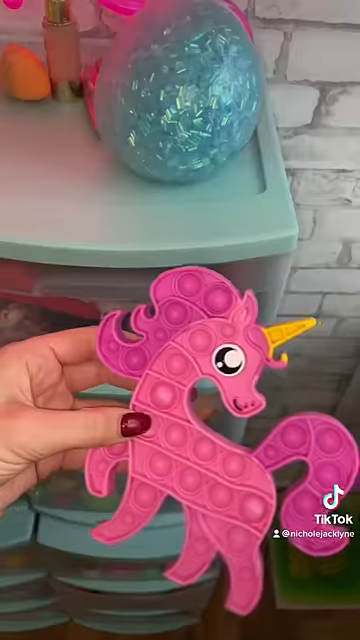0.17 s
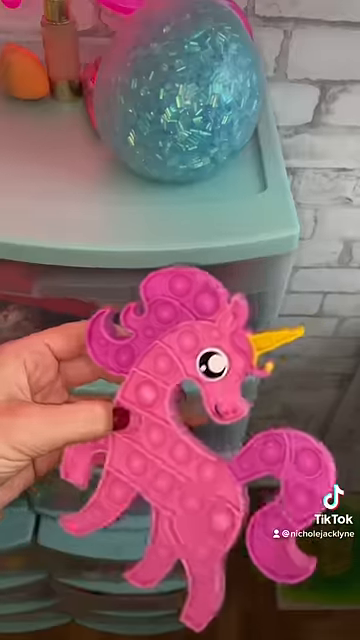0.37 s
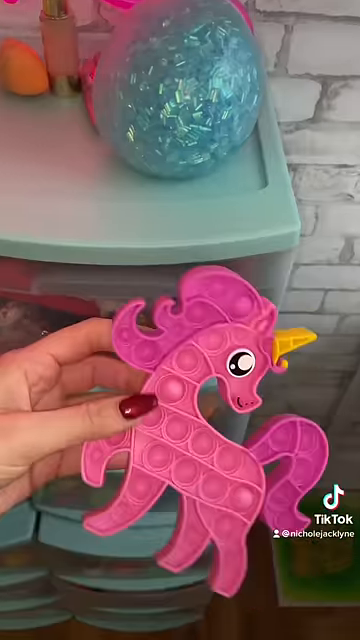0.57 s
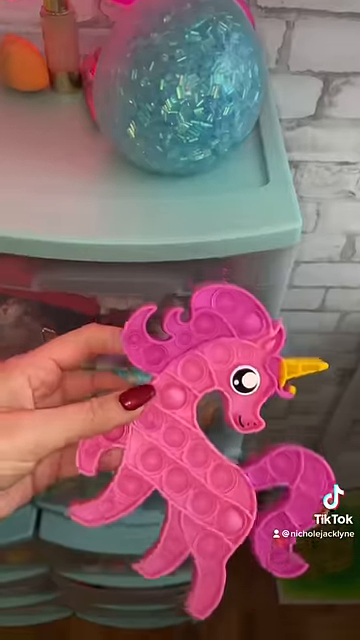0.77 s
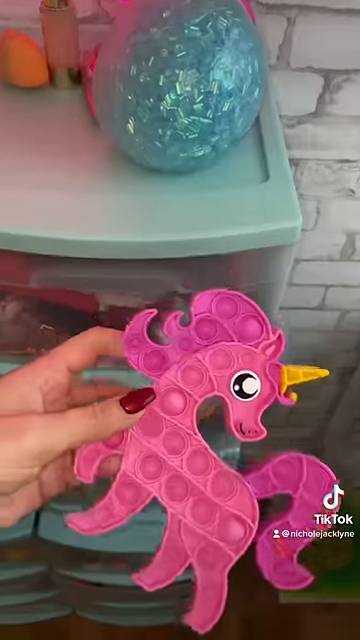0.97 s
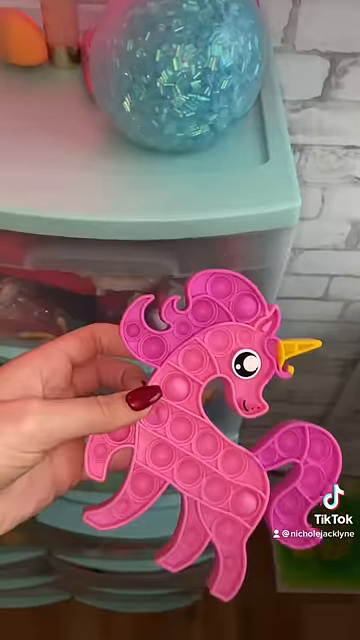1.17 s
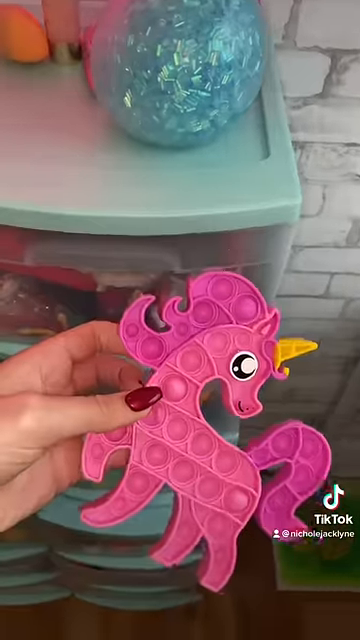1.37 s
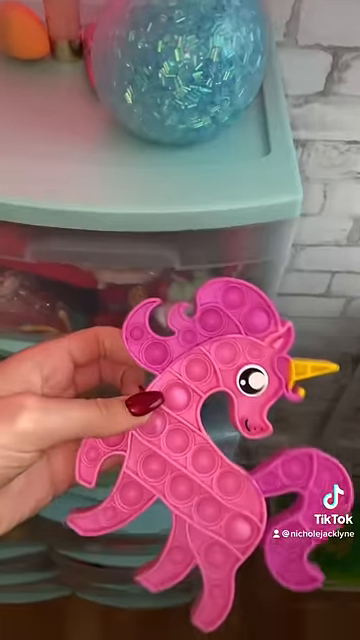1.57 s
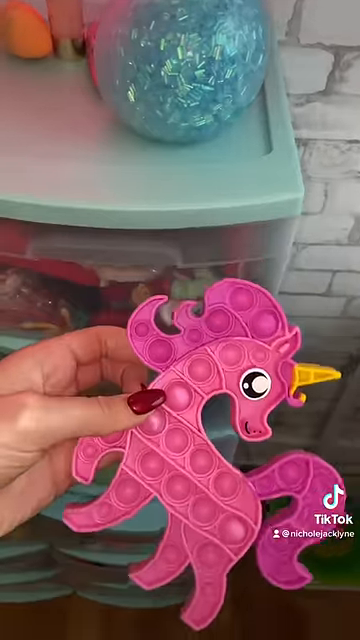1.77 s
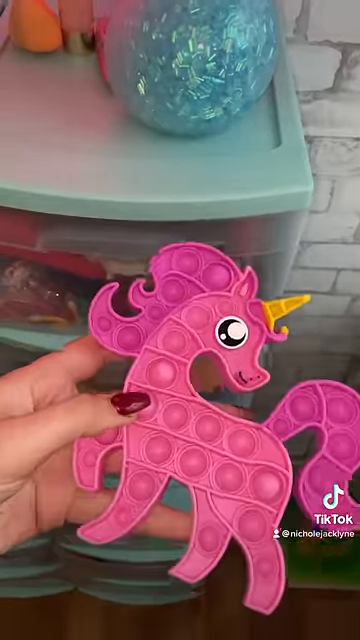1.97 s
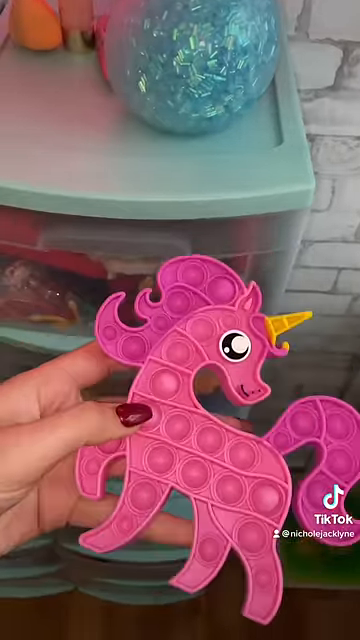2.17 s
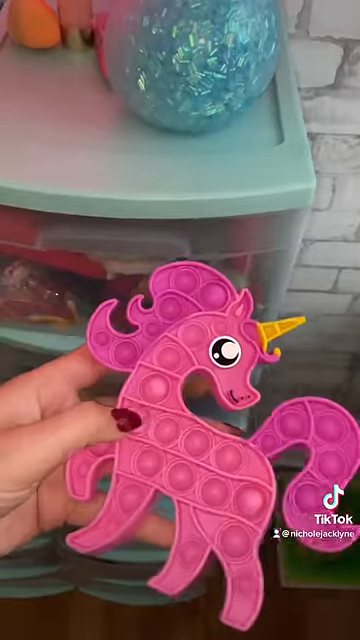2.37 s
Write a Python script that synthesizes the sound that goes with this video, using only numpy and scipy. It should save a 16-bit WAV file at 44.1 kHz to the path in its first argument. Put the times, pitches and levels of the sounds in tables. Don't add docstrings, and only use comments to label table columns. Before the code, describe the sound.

A hand presses a silicone bubble toy close to a phone microphone: one loud sharp pop, then two much softer ones, with tiny nail ticks and skin rubs between, in a quiet, bare, slightly echoing room with low hum.

```python
import sys
import numpy as np
from scipy import signal
from scipy.fft import rfft, irfft, next_fast_len
from scipy.io import wavfile
from scipy.ndimage import uniform_filter1d

SR = 44100
rng = np.random.default_rng(int(sys.argv[2]) if len(sys.argv) > 2 else 0)


def elevation(decibels):
    levels = np.asarray(decibels, float)
    return 10 ** (levels / 20)


def transcribe(u):
    v = np.clip(np.atleast_2d(u).T, -1, 1)
    q = np.round(v * 32767).astype(np.int16)
    wavfile.write(sys.argv[1], SR, q)


N = 106060

# t/s, direction (+1 or -1), rim f/Hz, build-up factor
FLIPS = [
    (.2461, 1, 3150, 1.0),
    (1.6540, -1, 3420, 1.15),
    (2.26713, 1, 3290, 1.05),
]
# level/dB, pitch factor, low modes/dB, brightness/dB, peel hiss/dB
POPS = [
    (-12.5, 1.029, -3.5, -8, -46.5),
    (-23.5, 1.036, -5.5, -7, -55),
    (-25, 0.955, -6, -15.5, -78),
]
# f/Hz, level/dB, polarity; the last is the rim, whose f is a factor on its own pitch
DOME_MODES = [(291.6, -36.5, -1), (510, -4, -1), (1124, 0, 1), (1890, -10.5, -1), (0.982, -5.5, 1)]
BUILD_MS = [1.5, 1.6, 1.15, .95, .7]
SOFTNESS = 1.8
DIRECT_BUILD = 0.83
SIDEWAYS_BUILD = 0.75
PEEL_RISE_S, PEEL_FALL_S = 0.004, 0.002
PEEL_HZ, PEEL_WIDTH_HZ = 8200, 6500
# t/s, peak level/dB, f/Hz, build-up/ms
TICKS = [(.1440, -47, 2610, 0.38), (.2451, -35.5, 6280, 0.72), (0.2479, -42.5, 5080, 0.43),
         (.2520, -48, 6300, 0.79), (.435, -62, 7900, 0.89), (0.542, -57, 3520, 0.47),
         (.584, -58, 3600, 0.74), (0.6596, -50.5, 1930, 0.79), (0.6591, -52.5, 6440, .5),
         (.7597, -56.5, 1177, 1.3), (.7598, -53, 3400, 0.38), (1.2175, -54, 3380, 0.2),
         (1.291, -61.5, 8730, 1.0), (1.290, -48, 560, 2.5), (1.351, -53, 790, 1.4),
         (1.4601, -65, 1120, 1.8), (1.653, -46, 2560, 1.9)]
# middle t/s, half length/s, level/dB, centre f/Hz, width/Hz
RUBS = [(0.07, 0.044, -67.5, 7600, 6000), (0.237, .04, -62, 7200, 4260), (.28, 0.098, -69.5, 6060, 2520),
        (0.507, 0.26, -75, 3230, 2530), (0.63, 0.049, -70.5, 8800, 6140), (.88, 0.054, -70, 3500, 3000),
        (.881, 0.026, -74.5, 10200, 4000), (1.287, 0.0058, -64, 658, 500), (1.362, 0.011, -78, 720, 590),
        (1.6545, 0.0069, -55.5, 3340, 900), (.20, 0.056, -76, 11000, 3000), (.42, 0.22, -79.5, 7810, 7960),
        (1.932, 0.1, -74, 2920, 2000), (1.963, 0.034, -68, 7510, 3000), (2.202, 0.35, -78.5, 5690, 500)]
RUB_GRAIN = 0.25
# f/Hz, t60/s
ROOM_DECAY = [(250, .4), (500, .5), (800, 0.74), (1300, 0.82), (2000, 0.56), (3500, 0.59), (8000, 0.33)]
# f/Hz, level/dB
ROOM_TONE = [(250, 8), (500, -1.5), (800, 5.5), (1100, -7.5), (1400, -1.5), (2200, 5), (3300, -2.5),
             (6000, -1.5)]
ROOM_DB, ROOM_GAP_S = -12.5, 0.0044
# delay/s, level/dB
ECHOES = [(.0072, -25), (.0098, -29), (.0135, -27)]
# t/s, f/Hz, level/dB
HUM = [
    [(0.0, 63.1, -52), (0.036, 64.5, -49), (0.06, 68.38, -48.5)],
    [(0.15, 64.46, -54.5), (0.344, 67.85, -61), (0.422, 64.5, -61), (0.488, 64.76, -45.5),
     (0.62, 64.63, -60)],
    [(0.62, 66.4, -52), (0.696, 69.5, -55.5), (0.728, 72.04, -68), (0.796, 65.98, -47), (1.09, 66.55, -58)],
    [(1.2, 63.8, -61), (1.376, 64.86, -47), (1.528, 63.8, -75), (1.57, 67, -91), (1.6, 62.4, -60)],
    [(1.6, 61.65, -68), (1.622, 68.2, -50), (1.692, 65.5, -52.5), (1.78, 63.54, -57), (1.96, 62.1, -53.5)],
    [(2.07, 60.4, -61.5), (2.11, 60.3, -53.5), (2.138, 58, -83), (2.272, 66.1, -51.5), (2.4, 65.3, -56)],
]
HUM_WIDTH_HZ, HUM_NOISE_DB = 16, -7
# t/s, level/dB, pitch factor
RUMBLE = [
    (0, -64.5, 1.018),
    (0.451, -66, 1),
    (.6, -61, 0.99),
    (.85, -58.5, 1.01),
    (1.079, -61, 1.088),
    (1.3, -66, 0.92),
    (1.6, -67, 0.926),
    (2.0, -68.5, 0.83),
    (2.4, -85.5, 1.0),
]
# f/Hz, width/Hz, level/dB
RUMBLE_BANDS = [(189, 7.1, -5), (309.7, 57, 1), (417, 55, -1.5), (532.6, 36, -6)]
# f/Hz, density/(dB per Hz)
AIR = [(15, -81), (25, 3.5), (110, -0.5), (204, -11), (260, -10), (410, -13), (741, -20.5), (9300, -35.5),
       (15500, -43.5)]
AIR_DB, AIR_PATCH_DB = -60.5, 1.5
# f/Hz, level/dB
WHINE = [(5572, -95), (5986, -94), (7978, -95), (8979, -88), (9975, -98), (10971, -92), (11972, -92),
         (12968, -93)]
WHINE_WAVER_DB = 1.5
# f/Hz, gain/dB
MIC = [(20, -16.5), (45, 2), (12300, -0.5), (13300, -3), (15200, -4.5), (15500, -37.5), (16000, -69)]
# start t/s, end t/s
SILENCES = [
    (.0680, .1379),
    (1.1013, 1.1902),
    (1.9680, 2.0611),
]


def evened(x):
    return x / np.sqrt(np.mean(x ** 2) + 1e-20)


def read(points, hz):
    f, value = np.transpose(points)
    return np.interp(np.log(hz + 1), np.log(f + 1), value)


def add(mix, s, sound):
    part = mix[round(s * SR):][:len(sound)]
    part += sound[:len(part)]


def resonate(x, hz, width):
    turn = np.exp(2j * np.pi * np.cumsum(hz * np.ones(len(x))) / SR)
    r = np.exp(-np.pi * width / SR)
    smooth = signal.lfilter([1 - r], [1, -r], x / turn + 1e-18)
    return 2 * (turn * smooth).real


def band_noise(noise, hz, width):
    return evened(resonate(resonate(noise, hz, width), hz, width))


def ring(hz, rise_ms):
    t = np.arange(1024) / SR
    u = t * 1000 / max(rise_ms, 0.05)
    envelope = (u * np.exp(1 - u)) ** SOFTNESS
    return envelope * np.sin(2 * np.pi * hz * t)


def dome_pops(build):
    out = np.zeros(N)
    for (s, direction, rim_hz, slow), (db, pitch, low_db, bright_db, _) in zip(FLIPS, POPS):
        colour_db = [low_db, low_db, 0, bright_db / 2, bright_db]
        tune = [pitch, pitch, pitch, pitch, rim_hz]
        snap = np.zeros(1024)
        for (hz, mode_db, side), colour, factor, ms in zip(DOME_MODES, colour_db, tune, BUILD_MS):
            level = np.sign(side) * elevation(db + mode_db + colour)
            snap += level * ring(hz * factor, ms * build * slow)
        add(out, s, direction * snap)
    return out


def skin_peel():
    t = np.arange(N) / SR
    hiss = band_noise(rng.standard_normal(N), PEEL_HZ, PEEL_WIDTH_HZ)
    envelope = np.zeros(N)
    for (s, *_), (*_, peel_db) in zip(FLIPS, POPS):
        fade_s = np.where(t < s, PEEL_RISE_S, PEEL_FALL_S)
        envelope += elevation(peel_db) * np.exp(-abs(t - s) / fade_s)
    return hiss * envelope


def ticks():
    out = np.zeros(N)
    for s, db, hz, ms in TICKS:
        add(out, s, elevation(db) * ring(hz, ms))
    return out


def finger_rubs():
    t, out = np.arange(N) / SR, np.zeros(N)
    roughness = evened(uniform_filter1d(rng.standard_normal(N), size=90))
    grain = np.exp(RUB_GRAIN * roughness)
    for s, half_s, db, hz, width in RUBS:
        hiss = band_noise(rng.standard_normal(N), hz, width)
        stroke = np.exp(-((t - s) / half_s) ** 2)
        out += elevation(db) * hiss * grain * stroke
    return out


def room(x):
    taps = np.zeros(SR)
    at = np.arange(0, SR - 20, 20)
    taps[at + rng.integers(0, 20, len(at))] = rng.choice([-1., 1.], len(at))
    hz, t, z = signal.stft(taps, SR, nperseg=256)
    decay_db = read(ROOM_TONE, hz)[:, None] - 60 * t / read(ROOM_DECAY, hz)[:, None]
    tail = signal.istft(z * elevation(decay_db), SR, nperseg=256)[1]
    response = np.zeros(SR)
    add(response, ROOM_GAP_S, elevation(ROOM_DB) * tail / np.linalg.norm(tail))
    for s, db in ECHOES:
        add(response, s, elevation(np.array([db])))
    return signal.fftconvolve(x, response)[:N]


def machine_hum():
    s, hz, db = np.concatenate(HUM).T
    t = np.arange(N) / SR
    hz = np.interp(t, s, hz)
    tone = np.sqrt(2) * np.sin(2 * np.pi * np.cumsum(hz) / SR)
    fuzz = band_noise(rng.standard_normal(N), hz, HUM_WIDTH_HZ)
    return elevation(np.interp(t, s, db)) * (tone + elevation(HUM_NOISE_DB) * fuzz)


def far_rumble():
    s, db, pitch = np.transpose(RUMBLE)
    t, noise = np.arange(N) / SR, rng.standard_normal(N)
    drift = np.interp(t, s, pitch)
    bands = np.zeros(N)
    for hz, width, band_db in RUMBLE_BANDS:
        narrow = resonate(noise, hz * drift, width)
        bands += elevation(band_db) * evened(resonate(narrow, hz * drift, 2 * width))
    return elevation(np.interp(t, s, db)) * evened(bands)


def air():
    frames, hz = N // 512 + 6, np.fft.rfftfreq(2048, 1 / SR)
    a, b, patches = rng.standard_normal((frames, 1025, 3)).T
    patches = uniform_filter1d(patches, size=20, axis=0)
    patches = evened(uniform_filter1d(patches, size=6, axis=1))
    z = (a + 1j * b) * elevation(read(AIR, hz)[:, None] + AIR_PATCH_DB * patches)
    whole = signal.istft(z, nperseg=2048, noverlap=1536)[1][:N]
    upper = signal.istft(z * (hz > 90)[:, None], nperseg=2048, noverlap=1536)[1]
    return elevation(AIR_DB) * whole / upper.std()


def whine():
    t, out = np.arange(N) / SR, np.zeros(N)
    for hz, db in WHINE:
        waver = uniform_filter1d(rng.standard_normal(N), size=3000)
        waver = evened(uniform_filter1d(waver, size=3000))
        tone = np.sqrt(2) * np.sin(2 * np.pi * (hz * t + rng.random()))
        out += elevation(db + WHINE_WAVER_DB * waver) * tone
    return out


def scene():
    small = skin_peel() + ticks()
    direct = dome_pops(DIRECT_BUILD) + small
    reflected = room(dome_pops(SIDEWAYS_BUILD) + small)
    background = machine_hum() + far_rumble() + air() + whine()
    return (direct + reflected + finger_rubs() + background)[None]


def low_pass(x):
    return signal.sosfilt(signal.butter(12, 15710, fs=SR, output="sos"), x)


def record(dry):
    t, live, size = np.arange(N) / SR, np.ones(N), next_fast_len(N)
    for start, end in SILENCES:
        live[(t > start) & (t < end)] = 0
    response = elevation(read(MIC, np.fft.rfftfreq(size, 1 / SR)))
    heard = irfft(rfft(dry, size) * response, size)[:, :N]
    return low_pass(heard * live)


dry = scene()
out = record(dry)
transcribe(out)
```